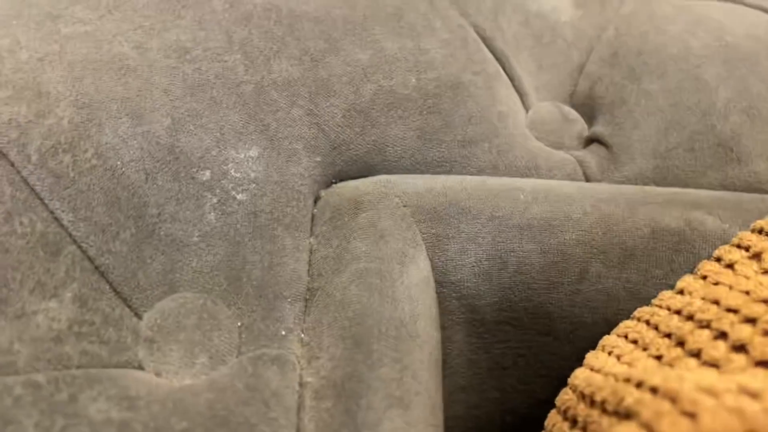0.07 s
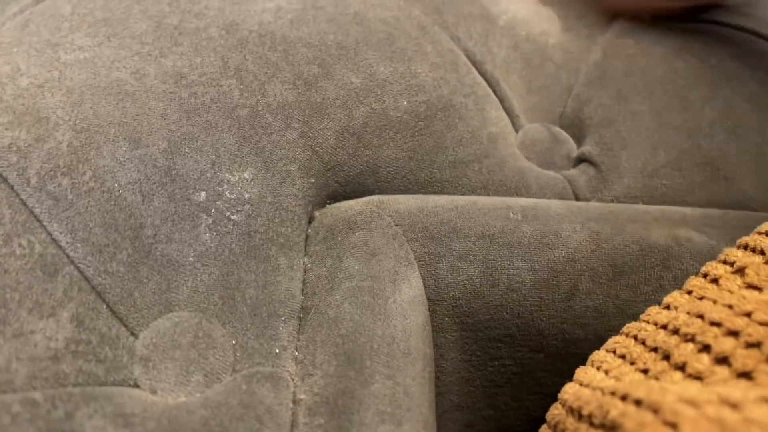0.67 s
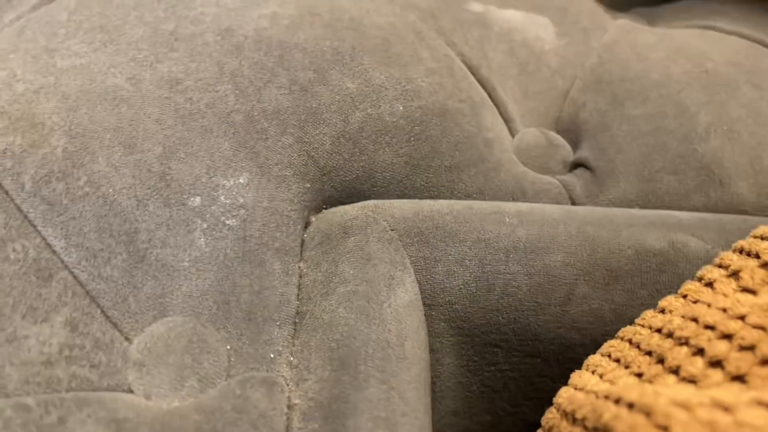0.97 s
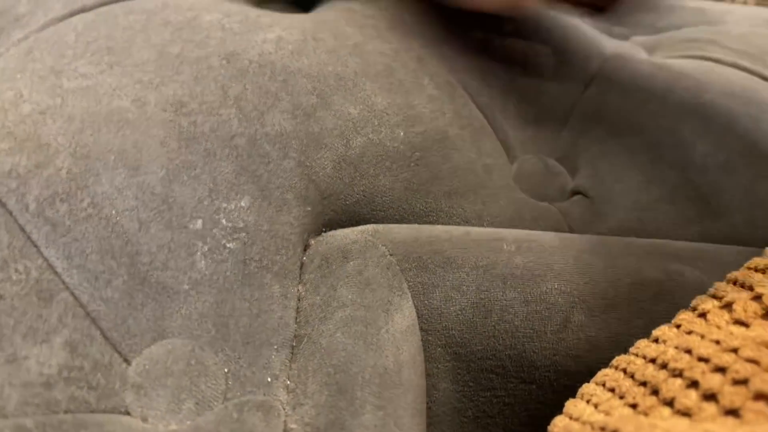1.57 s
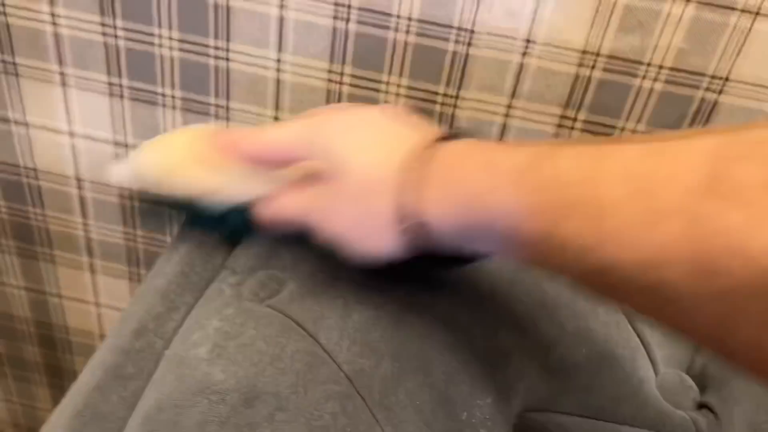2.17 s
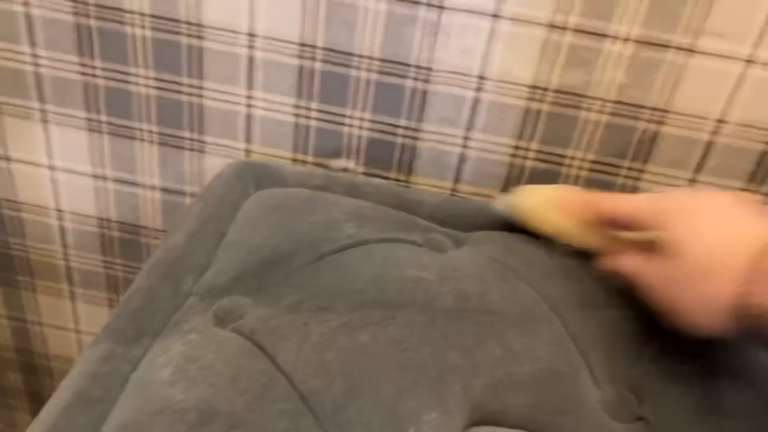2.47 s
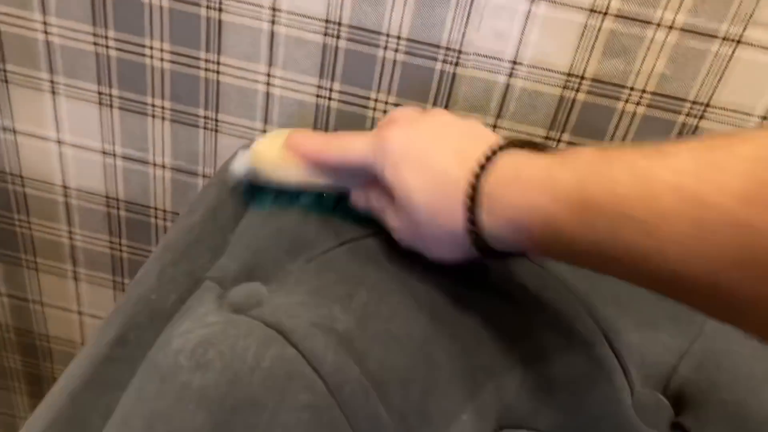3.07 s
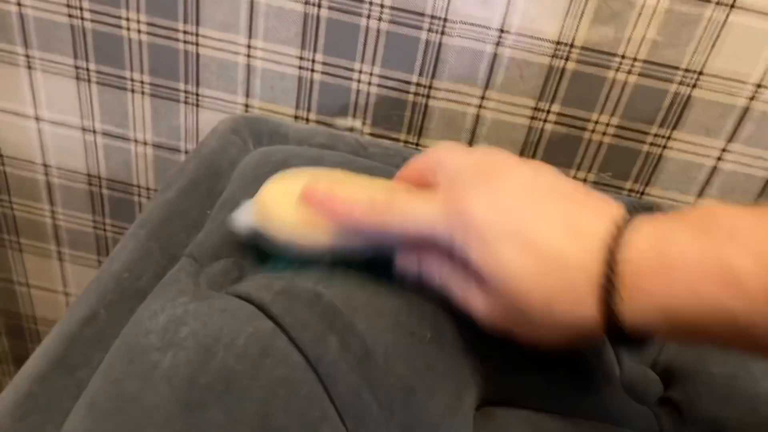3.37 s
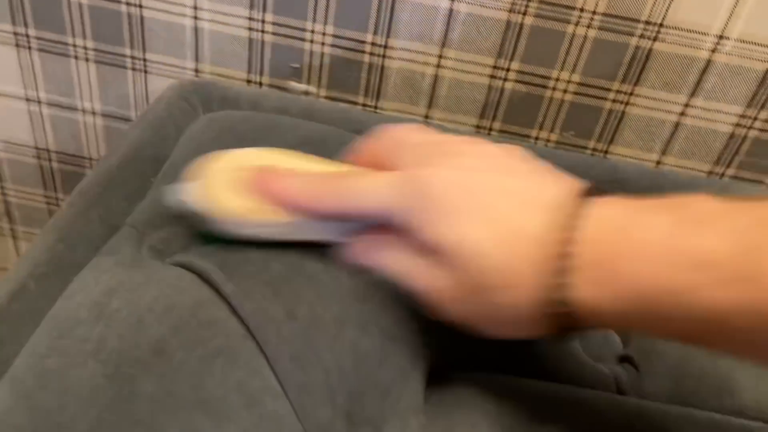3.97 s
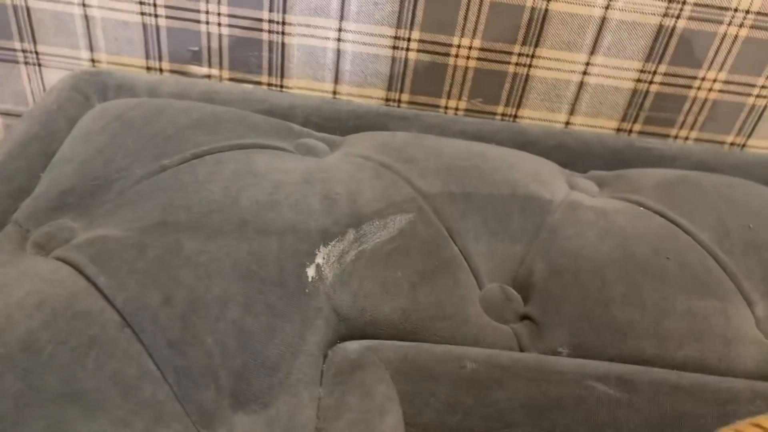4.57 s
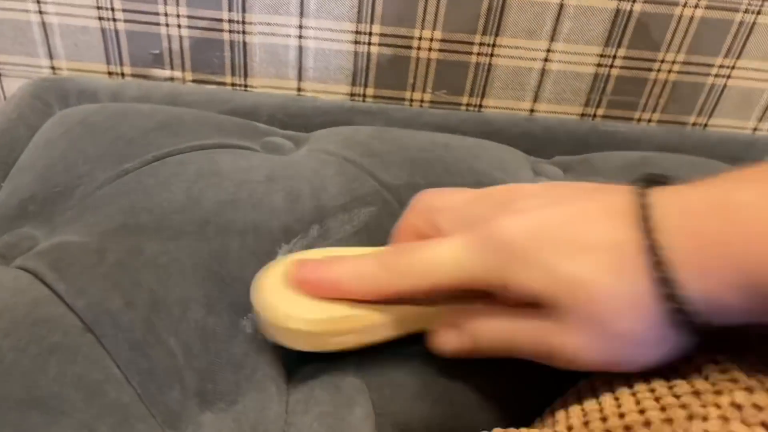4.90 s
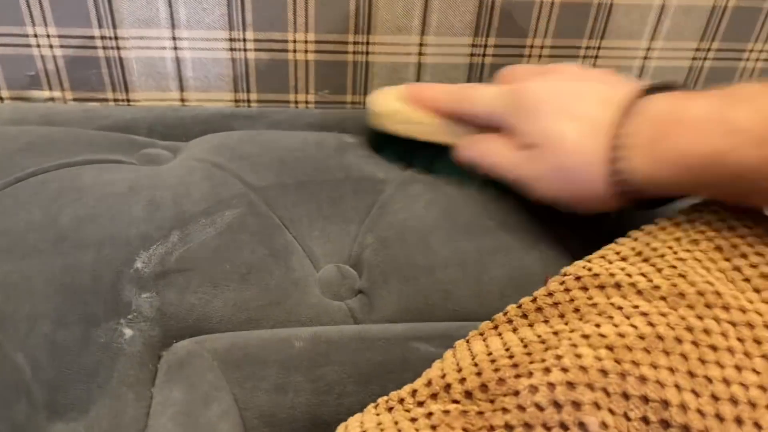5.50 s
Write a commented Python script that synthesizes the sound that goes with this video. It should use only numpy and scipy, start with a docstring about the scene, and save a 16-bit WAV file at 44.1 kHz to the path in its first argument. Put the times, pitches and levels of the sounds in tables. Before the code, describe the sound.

Close bristles swish and hiss back and forth over sofa upholstery, the padding thumping dully and the brush knocking hard against the frame.

```python
"""A hand brush scrubs a padded velvet sofa back and forth, close by, in a living room.
It starts with quick swishes of the bristle tips and light bumps of the hand. Then the bristles rasp and
hiss over the cloth, a few snap free, and the cushion thuds where the hand leans in or turns.
The strokes get quicker, and near 3.8 seconds the brush's hard back knocks loudly on the sofa's frame.
Slower strokes follow, and a lighter knock comes at the very end."""
import sys
import numpy as np
from scipy import signal
from scipy.fft import rfft, irfft, next_fast_len
from scipy.io import wavfile
from scipy.ndimage import uniform_filter1d

SR = 44100
rng = np.random.default_rng(int(sys.argv[2]) if len(sys.argv) > 2 else 0)


def generate_wav(sig):
    """Save sig (samples, or channels by samples) to the path in sys.argv[1] as 16-bit PCM at SR."""
    pcm = np.round(np.clip(np.atleast_2d(sig).T, -1, 1) * 32767).astype(np.int16)
    wavfile.write(sys.argv[1], SR, pcm)


N = 248705


# Sweeps of the brush. Each row: start, time speeding up and time slowing down in seconds, then relative
# levels in dB for the weave's rasp, the pile's hiss, the tips' sizzle, the dull rub and the drumming.
STROKE_ROWS = [(-0.12, 0.073, 0.27, -48.5, -48.5, -40, -49, -49.5),
               (0.541, 0.059, 0.28, -44.5, -48.5, -41.5, -43.5, -40.5),
               (0.8, 0.074, 0.21, -46.5, -46, -42.5, -41.5, -41),
               (0.905, 0.06, 0.2, -39, -55, -45, -38.5, -32.5),
               (1.298, 0.042, 0.33, -45.5, -59, -47, -40.5, -40),
               (1.329, 0.26, 0.06, -42, -48.5, -45.5, -45.0, -37.5),
               (1.674, 0.072, 0.23, -38.5, -43.5, -41.5, -38, -34),
               (1.926, 0.15, 0.18, -38.5, -42.5, -42, -42.5, -36.5),
               (2.135, 0.18, 0.13, -37, -41, -41, -36.5, -43),
               (2.437, 0.087, 0.051, -35, -40, -41.5, -37.5, -37.5),
               (2.51, 0.088, 0.066, -37, -37.5, -39.5, -39, -36.5),
               (2.644, 0.084, 0.1, -35, -34.5, -36.5, -33, -28),
               (2.793, 0.1, 0.11, -37, -38.5, -41, -37, -32),
               (2.949, 0.071, 0.11, -34, -35.5, -36.5, -34.5, -37),
               (3.091, 0.074, 0.16, -37.5, -39.5, -42.5, -40, -48),
               (3.209, 0.13, 0.16, -35.5, -38, -39, -34, -37),
               (3.436, 0.063, 0.17, -38, -40.5, -41, -37.5, -39.5),
               (3.569, 0.14, 0.12, -36, -38.0, -38, -32.5, -29),
               (3.721, 0.13, 0.48, -40.5, -46, -44, -37.5, -34.5),
               (3.947, 0.071, 0.18, -32.5, -39, -39, -32.5, -30),
               (4.175, 0.19, 0.087, -36, -41.5, -40, -44, -35.5),
               (4.392, 0.092, 0.19, -38.5, -42, -43.5, -42, -51),
               (4.644, 0.16, 0.09, -38.5, -43.5, -44.5, -44.5, -50.5),
               (4.873, 0.13, 0.29, -36, -44, -41.5, -40, -59), (5.18, 0.23, 0.04, -42, -47, -45, -44, -34),
               (5.431, 0.17, 0.151, -38, -43, -41.5, -38, -35)]

def brush_strokes(speed_power=1.79, drag_db=-15, drag_s=0.03, ease_s=0.011):
    """A faster hand rubs louder. Gives five loudness curves, one for each sound of a stroke."""
    t, power = np.arange(N) / SR, np.zeros((5, N))
    for start, rise, fall, *levels_db in STROKE_ROWS:
        end = start + rise + fall
        moving = (t > start) & (t < end)
        speed = np.sin(np.pi / 2 * np.interp(t[moving], [start, start + rise, end], [0, 1, 0]))
        power[:, moving] += np.outer(from_db(levels_db), speed ** speed_power) ** 2
    # Bent tufts drag on through each turn and round off every start and stop.
    fade = np.exp(-1 / (drag_s * SR))
    drag = from_db(drag_db) ** 2 * signal.lfilter([1 - fade], [1, -fade], power)
    return uniform_filter1d(np.sqrt(power + drag), 1 + int(2 * ease_s * SR), axis=1)


# The tone of the weave, the pile (velvet's fuzz) and the tips. Each row: pitch in Hz, relative level in dB.
WEAVE_TONE = [(500, -51), (780, -3.5), (980, -0.5), (1090, -4.5), (1220, 0), (1380, -0.5), (1580, -1.5),
              (1950, -5), (2600, -9), (3600, -20), (6000, -71)]
PILE_TONE = [(1500, -27), (2400, -2), (3100, 1), (4300, -2.5), (5500, -3), (6400, -3.5), (7300, -27.5),
             (8500, -15), (12000, -52)]
TIP_TONE = [(5000, -11), (7000, -4.5), (8200, -1), (9200, 1), (10500, 1.5), (11400, -1.5), (12300, -14),
            (13000, -13.5), (13600, -62), (16000, -19.5)]

def bristles(rasp, hiss, sizzle, tips_db=3.5, resting_db=-67):
    """Thousands of bristles slip over the cloth. Tufts catch and the grip varies, so the sound flutters."""
    weave = stereo_noise(slips(5000, 0.23), tone(WEAVE_TONE))
    weave = splaying_tufts(weave, depth_db=2.5, width_hz=41, hold_s=0.033)
    pile = stereo_noise(slips(18000, 0.99), tone(PILE_TONE))
    pile = splaying_tufts(pile, depth_db=2.35, width_hz=210, hold_s=0.02)
    tips = stereo_noise(slips(15000, 0.35), tone(TIP_TONE))
    tip_gain = from_db(tips_db) * np.hypot(sizzle, from_db(resting_db))  # resting tips still sizzle
    catch_db = 0.99 * drift(hz=80)
    grip_db = 0.6 * drift(hz=22)
    return from_db(catch_db + grip_db) * (rasp * weave + hiss * pile + tip_gain * tips)


def splaying_tufts(sound, depth_db, width_hz, hold_s):
    """Some pitches swell and others fade as the tufts spread and the hand moves over the cloth."""
    f, t, spectrum = signal.stft(sound, SR, nperseg=1024)
    swell = rng.standard_normal(spectrum.shape[1:])
    for axis, (step, width) in enumerate([(f[1], width_hz), (t[1], hold_s)]):  # smooth pitch, then time
        bell = np.exp(-(np.arange(-25, 26) * step / width) ** 2)
        swell = signal.fftconvolve(swell, np.expand_dims(bell, 1 - axis), "same")
    spectrum = spectrum * from_db(depth_db * rms_one(swell))
    return rms_one(signal.istft(spectrum, SR)[1][:, :N])


# The hand leans in. Each row: time of most weight and time to let go in seconds, then relative levels
# in dB for the dull rub, the cover's drumming and the padding's rumble.
HAND_LEANS = [(0.958, 0.055, -43, -35, -50), (1.385, 0.042, -43, -29.5, -44), (2.085, 0.019, -42, -31, -50),
              (2.624, 0.012, -33, -38, -39), (2.758, 0.016, -54, -38, -29), (3.018, 0.03, -30, -28.5, -32),
              (3.192, 0.042, -30, -29, -36), (3.352, 0.026, -32, -24.5, -42), (3.715, 0.017, -44, -44, -44),
              (3.915, 0.028, -28, -18.5, -32), (5.046, 0.056, -35, -18.5, -49),
              (5.601, 0.023, -49, -19, -48)]
# How hard the padding shakes. Each row: time in seconds, relative level in dB.
PADDING_SHAKE = [(0.0, -51), (0.11, -41), (0.19, -47.5), (0.28, -42), (0.44, -69), (1.0, -51), (1.22, -61),
                 (1.32, -59), (1.375, -35), (1.65, -52.5), (2.01, -35), (2.15, -59), (2.24, -32.5),
                 (2.37, -59), (2.43, -28), (2.5, -59), (2.95, -42), (3.1, -34), (3.22, -38.5), (3.31, -45),
                 (3.39, -24), (3.46, -39), (3.86, -32.5), (3.93, -24), (4.13, -58), (4.21, -32.5),
                 (4.34, -52), (4.68, -52), (5.4, -46.5), (5.64, -44.5)]
# Notes of the tight cover. Each row: pitch in Hz, width in Hz, relative level in dB.
COVER_NOTES = [(194.3, 23.6, 2), (272.7, 50, 0), (355.4, 30, 1), (434, 41, -6.5)]
# The tone of the rub and of the rumble. Each row: pitch in Hz, relative level in dB.
RUB_TONE = [(250, -5), (430, 1), (510, 1), (575, 1.5), (650, -1.5), (730, -1), (880, -4.5), (1100, -5),
            (1600, -54)]
PADDING_TONE = [(20, -25), (35, -7.5), (50, -2), (65, 4), (110, -4), (160, -8.5), (260, -11), (600, -64)]

def cushion(rubbing, drumming, rub_db=-1, cover_db=-2, padding_db=3, cover_top_hz=480):
    """Bent tufts rub and drum on the tight cover, harder where the hand leans in. The padding rumbles."""
    t, f = np.arange(N) / SR, frequencies() + 1
    lurch = from_db(3.5 * drift(hz=18))
    shaking = from_db(np.interp(t, *np.transpose(PADDING_SHAKE)))
    gains = np.array([rubbing, drumming * lurch, shaking])
    for at, let_go, *levels_db in HAND_LEANS:
        width_s = np.where(t < at, 0.54 * let_go, let_go)  # the weight comes on faster than it leaves
        weight = np.exp(-.5 * ((t - at) / width_s) ** 2)
        gains = np.hypot(gains, np.outer(from_db(levels_db), weight))
    notes = sum((-1) ** k * from_db(db) / (1 + 1j * (f * f - hz * hz) / (f * width))
                for k, (hz, width, db) in enumerate(COVER_NOTES))
    rub = gains[0] * stereo_noise(slips(2500, 1.5), tone(RUB_TONE))
    cover = gains[1] * stereo_noise(slips(2000, 1.0), notes / (1 + (f / cover_top_hz) ** 8))
    padding = gains[2] * stereo_noise(slips(2000, 1.0), tone(PADDING_TONE))
    return from_db(rub_db) * rub + from_db(cover_db) * cover + from_db(padding_db) * padding


# Brief ringing of the tufts and the hollow under the brush. Each row: loudest moment in seconds,
# half length in seconds, pitch in Hz, width in Hz, level in dB.
HOLLOW_RINGS = [(0.13, 0.032, 1490, 250, -59.5), (0.171, 0.036, 2020, 550, -57.5),
                (0.33, 0.012, 950, 400, -68), (0.477, 0.0093, 1300, 1300, -66.5),
                (0.865, 0.021, 5360, 2200, -43.5), (0.978, 0.037, 548, 89.5, -32.5),
                (0.99, 0.036, 2580, 900, -47), (1.0, 0.04, 1125, 90, -45), (1.53, 0.053, 920, 200, -49),
                (1.79, 0.042, 1000, 300, -47), (1.81, 0.049, 2230, 1200, -44.5),
                (2.09, 0.054, 1750, 500, -44.5), (2.3, 0.032, 1020, 350, -38.5),
                (3.549, 0.051, 770, 169, -42.5), (4.204, 0.011, 610, 200, -33.5),
                (4.34, 0.045, 1580, 460, -40), (4.511, 0.044, 1110, 350, -44),
                (4.52, 0.052, 1931, 603, -41.5), (4.575, 0.026, 230, 180, -41.5),
                (4.731, 0.025, 370, 120, -44), (4.779, 0.042, 1220, 400, -44.5),
                (4.787, 0.032, 2120, 700, -43), (5.411, 0.016, 3600, 3000, -43),
                (5.603, 0.035, 1500, 500, -42)]

def hollows(slips_per_s=3000, side_share=0.48):
    """Slipping bristles stir up brief ringing, which makes a stroke sound hollow or biting."""
    out = np.zeros((2, N + SR))
    for at, half, hz, width_hz, db in HOLLOW_RINGS:
        span = np.arange(max(int((at - 3 * half) * SR), 0), int((at + 3 * half) * SR))
        ticks = rng.standard_normal((3, len(span))) * (rng.random((3, len(span))) < slips_per_s / SR)
        band_hz = [hz - width_hz / 2, hz + width_hz / 2]
        ringing = filtered(ticks[0] + side_share * ticks[1:], "band", band_hz)
        swell = np.exp(-.5 * ((span / SR - at) / half) ** 2)
        out[:, span] += from_db(db) * rms_one(ringing) * swell
    flutter = from_db(0.5 * drift(hz=60))
    return out[:, :N] * flutter


# Quick flicks of the tips. Each row: middle in seconds, level in dB, half length in seconds.
TIP_FLICKS = [(0.008, -18.5, 0.023), (0.07, -27, 0.012), (0.101, -40.5, 0.025), (0.684, -35.5, 0.011),
              (4.856, -39, 0.031)]
# Their tone. Each row: pitch in Hz, relative level in dB.
FLICK_TONE = [(1000, -32), (4800, -24.5), (7000, -13), (8000, -10), (9400, -0.5), (10700, -1.5),
              (12000, -7.5), (13400, -31), (16000, -20)]

def flicks():
    """The tips alone skim the cloth in short, bright swishes that start and stop sharply."""
    t = np.arange(N) / SR
    swell = sum(from_db(db) / (1 + ((t - at) / half) ** 6) for at, db, half in TIP_FLICKS)
    return swell * stereo_noise(slips(18000, 0.81), tone(FLICK_TONE))


# Soft blows into the padding. Each row: start in seconds, the thud's relative level in dB, its pitch
# in Hz, the cloth pat's relative level in dB.
CUSHION_THUDS = [(0.623, -27.5, 237, -35), (0.932, -23, 276, -30), (0.957, -20, 205, -22.5),
                 (1.347, -12, 374, -30), (1.366, -13, 194, -43), (1.829, -21, 175, -54),
                 (1.925, -26.5, 122.1, -57.5), (2.006, -21, 103, -38), (2.231, -22, 105, -35.5),
                 (2.418, -22, 108, -40), (2.752, -17.5, 196, -30), (2.991, -14.5, 222, -21.5),
                 (3.377, -20, 80, -52), (3.477, -18, 94, -56), (3.581, -13, 104, -30),
                 (3.711, -11, 183, -24), (3.81, -9, 182, -43), (3.9, -7, 141, -29), (3.92, -9.5, 302, -22),
                 (3.974, -14, 231, -34), (4.095, -10.5, 355, -49), (4.19, -19, 255, -36),
                 (4.318, -23.5, 232, -51), (5.059, -15, 98, -50), (5.066, -15.5, 353, -40)]

def thuds(thud_db=-3, pat_db=5.5, pat_hz=520, push_cycles=0.71, fade_s=0.064):
    """The cloth pats as it is touched, then the push sets the cushion swinging for a moment."""
    out, t = np.zeros(N), np.arange(SR // 3) / SR
    pat = filtered(ring(pat_hz, fade_s=0.016), "low", 2.9 * pat_hz)
    for start, db, hz, cloth_db in CUSHION_THUDS:
        swing = ring(hz, fade_s) + from_db(-17) * ring(2.1 * hz, fade_s)
        build_up = 1 - np.exp(-(t * hz / push_cycles) ** 2)
        add(out, start, db + thud_db, swing * build_up)
        add(out, start, cloth_db + pat_db, pat)
    return out


# Notes of the brush's back and the sofa's frame. Each row: pitch in Hz, relative level in dB,
# seconds to fade by 60 dB.
FRAME_NOTES = [(183, -3, 0.16), (343, 0.5, 0.041), (574, 5, 0.031), (669, 6, 0.024), (944, 3.5, 0.028),
               (1210, 2.5, 0.026), (1605, 3, 0.023), (1945, 2, 0.01), (2410, 0.5, 0.012), (5960, 3, 0.0031)]
# The brush hits the frame. Each row: start in seconds, peak in dB, bass cut in Hz, treble cut in Hz.
FRAME_KNOCKS = [(1.3469, -21.5, 198, 1000), (3.78, 0, 120, 4000), (3.816, -20, 900, 2500),
                (5.617, -17, 1100, 4000), (5.6222, -37, 1100, 2500)]

def knocks(crack_db=-17, crack_fade_s=0.02):
    """Hard blows crack and ring the frame. Padding dulls them, and light taps leave the low notes still."""
    out, t = np.zeros(N), np.arange(SR // 3) / SR
    ringing = sum((-1) ** k * from_db(db) * ring(hz, fade_s)
                  for k, (hz, db, fade_s) in enumerate(FRAME_NOTES))
    crack = from_db(crack_db) * rng.standard_normal(len(t)) * fade_out(t, crack_fade_s)
    for start, db, bass_hz, treble_hz in FRAME_KNOCKS:
        knock = filtered(ringing, "low", treble_hz) + filtered(crack, "low", 2 * treble_hz)
        add(out, start, db, filtered(knock, "high", bass_hz))
    return out


# The hand bumps the sofa. Each row: start in seconds, peak in dB, starting pitch in Hz.
HAND_BUMPS = [(0.087, -38, 400), (0.098, -33, 200), (0.11, -32, 710), (0.129, -38, 380), (0.141, -29, 650),
              (0.222, -37, 560), (0.236, -32.5, 533), (0.245, -33, 300), (0.262, -37, 610),
              (0.275, -30.5, 140), (0.289, -41, 460), (0.47, -52, 520), (2.205, -27, 300),
              (2.262, -25, 300), (3.212, -23, 650), (3.385, -19, 200)]

def bumps(end_hz=72, settle_s=0.00503, fade_s=0.08, attack_s=0.0025):
    """Each soft bump of the hand dives quickly into the bass as the padding gives way."""
    out, t = np.zeros(N), np.arange(SR // 3) / SR
    build_up = 1 - np.exp(-(t / attack_s) ** 2)
    for start, db, start_hz in HAND_BUMPS:
        hz = end_hz + (start_hz - end_hz) * np.exp(-t / settle_s)
        swing = np.sin(2 * np.pi * np.cumsum(hz) / SR) * fade_out(t, fade_s)
        add(out, start, db, swing * build_up)
    return out


# Single bristles snap free. Each row: start in seconds, peak in dB, pitch in Hz.
BRISTLE_SNAPS = [(0.617, -18, 8600), (0.639, -25, 11400), (0.953, -19, 9000), (0.957, -23, 7800),
                 (1.043, -26, 9000), (2.911, -22, 11000)]

def snaps(fade_s=0.006):
    """A bent bristle springs free with a short, bright tick."""
    out, t = np.zeros(N), np.arange(SR // 20) / SR
    for start, db, hz in BRISTLE_SNAPS:
        burst = rng.standard_normal(len(t)) * fade_out(t, fade_s)
        add(out, start, db, filtered(burst, "band", [0.85 * hz, 1.05 * hz]))
    return out


def room_echo(sound, level_db=-20, fade_s=0.2):
    """The living room answers with a short, dull echo, different on each side."""
    t = np.arange(SR // 3) / SR
    tail = filtered(rng.standard_normal((2, len(t))), "low", 2000) * fade_out(t, fade_s) * (t > .004)
    tail /= np.sqrt(np.sum(tail ** 2))
    return from_db(level_db) * signal.fftconvolve(sound[None], tail, axes=1)[:, :N]


# The tone of the quiet room. Each row: pitch in Hz, relative level in dB.
QUIET_TONE = [(20, -13), (55, -2), (120, -17), (400, -19), (1500, -24.5), (9000, -17), (14000, -50)]

def quiet_room(level_db=-62):
    """A faint, steady rumble and hiss lies under everything."""
    return from_db(level_db) * stereo_noise(rng.standard_normal((3, N)), tone(QUIET_TONE))


def slips(per_s, spread_db):
    """Three streams of tiny slips of uneven size: one shared, one for the left, one for the right."""
    happens = rng.random((3, N)) < per_s / SR
    sizes = rng.standard_normal((3, N))
    return happens * sizes * from_db(spread_db * np.abs(sizes))


# How alike left and right sound. Each row: pitch in Hz, likeness from 0 to 1.
SIDE_LIKENESS = [(60, .8), (350, .8), (700, .52), (2500, .66), (5300, .66), (7200, .6), (8400, .92),
                 (9300, .86), (10200, .98), (11200, .86)]

def stereo_noise(streams, gains):
    """Give three streams a tone and mix them into a partly alike left and right, at level 1."""
    alike = np.clip(over_hz(SIDE_LIKENESS), 0, 1)
    spectra = rfft(streams.astype(np.float32), 2 * (len(alike) - 1))
    pair = gains * (spectra[0] * np.sqrt(alike) + spectra[1:] * np.sqrt(1 - alike))
    return rms_one(irfft(pair.astype(np.complex64))[:, :N])


def from_db(db):
    """Turn decibels into a number to multiply by."""
    return 10 ** (np.asarray(db) / 20)


def rms_one(x):
    """Scale to an average (rms) level of 1."""
    return x / np.sqrt(np.mean(x ** 2) + 1e-20)


def frequencies():
    """The pitches in Hz at which a tone is shaped."""
    return np.fft.rfftfreq(2 * next_fast_len(N // 2 + SR // 4), 1 / SR)


def over_hz(points):
    """Fill in a table's values for every pitch."""
    hz, value = np.transpose(points)
    return np.interp(np.log(frequencies() + 1), np.log(hz), value)


def tone(points):
    """Turn a table of dB levels into a gain for every pitch."""
    return from_db(over_hz(points))


def shaped(sound, gains):
    """Multiply each pitch in a sound by its own gain."""
    size = 2 * (gains.shape[-1] - 1)
    return irfft(rfft(sound, size) * gains, size)[..., :N]


def filtered(sound, keep, hz):
    """Keep the "low" part, the "high" part or a "band" of a sound."""
    return signal.sosfilt(signal.butter(2, hz, keep, fs=SR, output="sos"), sound)


def drift(hz):
    """A smooth random wobble. More Hz makes it quicker."""
    return rms_one(shaped(rng.standard_normal(N), np.exp(-(frequencies() / hz) ** 2)))


def fade_out(t, fade_s):
    """Die away by 60 dB in fade_s seconds."""
    return from_db(-60 * t / fade_s)


def ring(hz, fade_s):
    """One struck note dying away."""
    t = np.arange(SR // 3) / SR
    return np.sin(2 * np.pi * hz * t) * fade_out(t, fade_s)


def add(out, start_s, peak_db, sound):
    """Place a sound at its time and peak level."""
    at = max(round(start_s * SR), 0)
    out[at:at + len(sound)] += (from_db(peak_db) * sound / np.abs(sound).max())[:N - at]


def scene():
    """Scrubbing and blows over the quiet room. Only the blows echo."""
    rasp, hiss, sizzle, rubbing, drumming = brush_strokes()
    scrubbing = bristles(rasp, hiss, sizzle) + flicks() + cushion(rubbing, drumming) + hollows()
    blows = thuds() + bumps() + knocks() + snaps()
    return scrubbing + blows + quiet_room() + room_echo(blows)


# Which side is louder. Each row: pitch in Hz, left minus right in dB.
SIDE_BALANCE = [(60, .8), (300, .3), (650, 1.8), (1100, -.5), (2000, 2.8), (4500, 3), (7500, 1.5),
                (8500, .2)]
# Which side's wave comes first. Each row: pitch in Hz, the left's lead in radians.
SIDE_LEAD = [(400, 0), (2100, -.1), (2900, 1), (4200, .5), (5300, .6), (6700, 0), (7450, 1), (8700, 0),
             (9500, -1.8), (10200, -3.14), (11000, -4.3), (11800, -6.28)]

def record(dry, low_cut_hz=38, high_cut_hz=15850):
    """Left and right differ in level and timing. Peaks are clipped, deep bass is trimmed,
    and the highest treble is cut off sharply."""
    sides = np.array([[.5], [-.5]])
    side_gains = from_db(sides * over_hz(SIDE_BALANCE)) * np.exp(1j * sides * over_hz(SIDE_LEAD))
    heard = filtered(shaped(dry, side_gains), "high", low_cut_hz)
    top_cut = 1 / np.sqrt(1 + (frequencies() / high_cut_hz) ** 200)
    return shaped(np.clip(heard, -1, 1), top_cut)


dry = scene()
out = record(dry)
generate_wav(out)
```